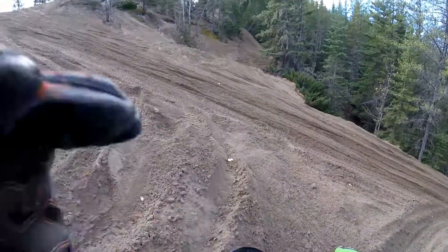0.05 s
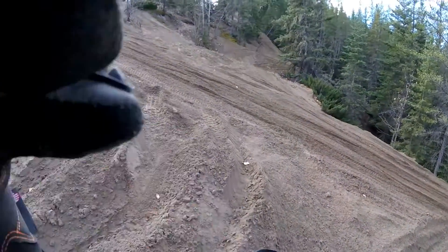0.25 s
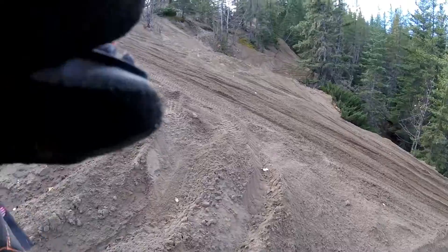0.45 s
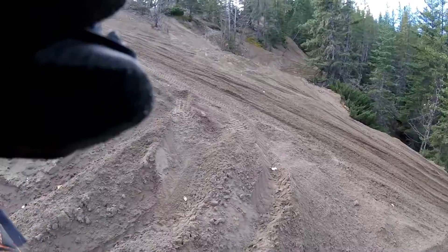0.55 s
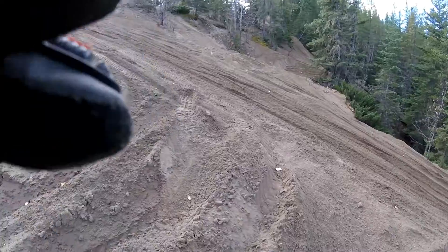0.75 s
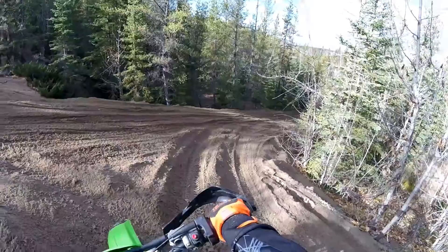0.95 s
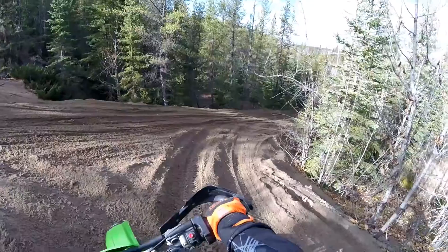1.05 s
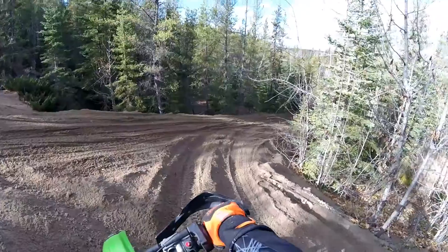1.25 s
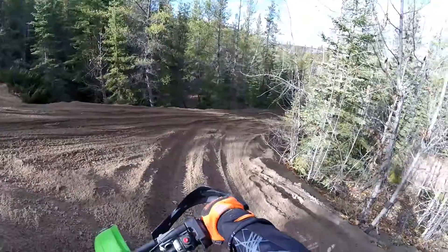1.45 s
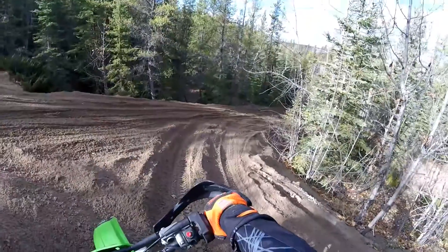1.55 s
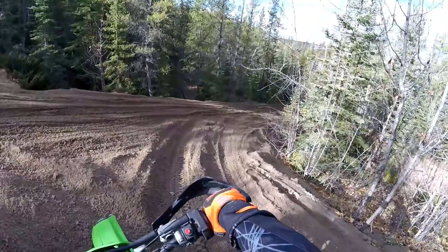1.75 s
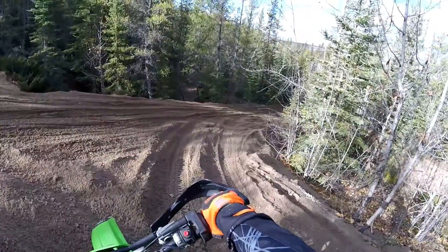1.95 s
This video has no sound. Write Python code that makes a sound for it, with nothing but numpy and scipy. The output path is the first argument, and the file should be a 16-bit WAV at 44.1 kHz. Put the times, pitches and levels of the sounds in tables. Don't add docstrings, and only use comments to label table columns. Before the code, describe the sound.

Gloved hand bumping and rubbing a camera housing, brief dropout, then a sputtering two-stroke dirt bike in wind

```python
import sys
import numpy as np
from scipy import signal
from scipy.fft import rfft, irfft, next_fast_len
from scipy.io import wavfile
from scipy.ndimage import uniform_filter1d, map_coordinates

SR = 44100
rng = np.random.default_rng(int(sys.argv[2]) if len(sys.argv) > 2 else 0)


def unload_audio(sound):
    columns = np.transpose(np.atleast_2d(sound))
    steps = np.round(np.clip(columns, -1, 1) * 32767)
    wavfile.write(sys.argv[1], SR, steps.astype(np.int16))


def voltage_ratio(level):
    return 10 ** (np.asarray(level, float) / 20)


N = 90405
CUT_S, BACK_S = 1.2172, 1.262

# time in seconds, hiss in dB, pressure in dB.
GLOVE_LEVELS = [(0, -54.5, -47), (.24, -52, -53), (.28, -51, -32), (.4, -57, -46), (.5, -55, -44),
                (.56, -60, -30), (.585, -64.5, -60), (.65, -61, -35), (.7, -61, -31.5), (.76, -57, -53),
                (.85, -60, -41.5), (.94, -59.5, -32.5), (.99, -65.5, -38.5), (1.05, -61.5, -43),
                (1.15, -67, -43.5), (1.165, -65, -66), (1.2, -76.5, -42)]
# frequency in Hz, level in dB per Hz.
RUB_COLOUR = [(120, -8.5), (200, -7.5), (400, -13), (750, -19.5), (1450, -21), (2700, -28.5), (8000, -34),
              (15500, -50.5)]
# frequency in Hz, width in Hz, lift in dB.
HOUSING_RINGS = [(3300, 170, -8), (4840, 110, -10), (6640, 480, 6.5)]
# frequency in Hz, level in dB per Hz.
PRESS_COLOUR = [(12, 2), (25, 1.5), (80, -18.5), (150, -25.5), (400, -37), (800, -79)]
# start in seconds, length in seconds, level in dB.
FABRIC_STROKES = [
    (0.273, .047, -68),
    (0.484, 0.023, -63),
    (0.539, 0.04, -60.5),
    (0.72, 0.063, -62),
    (.905, 0.03, -70),
]
# frequency in Hz, level in dB per Hz.
FABRIC_COLOUR = [(500, 6), (1500, 0), (2800, 4), (3800, -3), (5000, 8), (6500, 1), (7600, -7), (15500, -31)]
# start in seconds, length in seconds, level in dB.
THUMB_SLIDES = [
    (.276, 0.052, -61.5),
    (.671, 0.006, -53.5),
]
# frequency in Hz, level in dB per Hz.
PORT_COLOUR = [(1500, -18.5), (4500, 1.5), (5500, -13.5), (6500, 4), (7500, -8.5), (15500, -38)]
# start in seconds, peak in dB, length in seconds, brightness in dB.
FINGER_TAPS = [(0.121, -42.5, 0.015, -13.5), (0.2442, -26.5, 0.0088, -8), (0.2484, -38, 0.0094, -10),
               (0.273, -33, 0.0096, -14), (.3135, -41, 0.006, -3.5), (.2675, -23.5, 0.0097, -3),
               (0.2784, -35.5, 0.013, -6), (0.322, -29.5, 0.0093, -11), (.413, -37.5, 0.0028, -2.5),
               (0.433, -39, 0.0038, -3), (.4375, -29, 0.0057, -7.5), (0.514, -40.5, 0.0043, -3.5),
               (0.545, -43, 0.0053, -5), (.665, -36, 0.0052, -3.5), (0.6674, -30.5, 0.0075, -1.5),
               (0.674, -36.5, 0.0094, -7.5), (1.898, -54, 0.0095, -14), (2.017, -49, 0.0044, -19)]
# frequency in Hz, width in Hz, level in dB.
SHELL_LOW = [(274, 129, 7.5), (736, 220, 1.5), (1106, 194, 2.5)]
# frequency in Hz, width in Hz, level in dB.
SHELL_HIGH = [(1960, 1210, 1), (3370, 1500, -6.5), (6460, 245, -4.5)]
# start in seconds, peak in dB, frequency
# in Hz, 60 dB fade in seconds.
PUSHES_IN = [(.2465, -10, 150, 0.019), (.271, -34, 53, .08), (.284, -20.5, 35, .1), (.403, -27, 96, 0.039),
             (.4405, -25.5, 167, 0.037), (.466, -25, 70, 0.13), (.545, -38.5, 312, 0.038),
             (.563, -44.5, 390, 0.024), (.538, -22, 44, 0.034), (.612, -26, 9.8, 0.18),
             (.670, -20, 155, 0.024), (.755, -31.5, 21.7, 0.52), (1.772, -29, 106, 0.13),
             (1.895, -29.5, 99, 0.095), (1.297, -28, 32, 0.072), (.3255, -28.5, 162, 0.0355),
             (.4405, -24.5, 304, 0.044), (.447, -24.5, 78, 0.082), (1.897, -34.5, 316, 0.04),
             (2.013, -37.5, 290, 0.023), (1.705, -52, 300, 0.038),
             (.5475, -10, 36, .05),
]
# start in seconds, peak in dB, frequency in Hz, 60 dB fade in seconds.
PANEL_RINGS = [(.1215, -44, 1006, 0.027), (.2455, -31, 1224, 0.011), (.268, -21.5, 727, 0.014),
               (.3235, -35, 1110, 0.019), (.3235, -37.5, 400, 0.033), (.4375, -32.5, 1285, 0.02),
               (.438, -34.5, 1810, 0.013), (.667, -27.5, 764, 0.015), (.668, -33.5, 3300, 0.0079),
               (.668, -32, 1120, .02), (.668, -40, 4100, .008), (1.897, -40, 600, 0.022)]
# start in seconds, peak in dB, frequency
# in Hz, 60 dB fade in seconds.
PULLS_OUT = [(.2545, -16, 82, 0.037), (.268, -11.5, 180, 0.03), (.279, -18, 99, 0.036),
             (.294, -21.5, 67.3, 0.14), (.667, -21.5, 150, 0.012), (.5445, -29, 160, 0.014),
             (0.26, -25, 220, 0.014),
             (.572, -21, 13, .2),
]
FINAL_BLOW = 1.2079, -8.3, .00011, .0038, .4
# time in seconds, turns a second.
CRANK_SPEED = [(1.3, 88), (1.41, 96), (1.52, 95.5), (1.6, 102), (1.66, 107.5), (1.69, 107), (1.82, 99),
               (1.96, 91), (2.05, 98)]
# first pulse in seconds, length in seconds, level in dB, growth in dB a second.
FIRING_FITS = [(1.3255, .025, -65, 380), (1.386, .005, -63, 0), (1.4045, .015, -65, 850),
               (1.4365, .005, -67, 0), (1.457, .026, -64, 400), (1.49, .025, -66, 0),
               (1.5195, .168, -54, -24), (1.7215, .025, -63, 250), (1.764, .015, -66, 0),
               (1.8125, .014, -60, 450), (1.848, .04, -67, 0), (1.906, .005, -59, 0),
               (1.9595, .025, -59, 0), (1.9915, .005, -62, 0), (2.0015, .06, -54.5, 30)]
# frequency in Hz, width in Hz, level in dB.
PIPE_CLOSED = [(590, 95, 1.5), (850, 140, -11), (1300, 160, -13), (1550, 250, -14), (1950, 100, -17)]
# frequency in Hz, width in Hz, level in dB.
PIPE_OPENED = [(655, 105, 1.5), (850, 130, -7), (1500, 300, -22), (2010, 140, -17)]
# frequency in Hz, level in dB per Hz.
RASP_COLOUR = [(300, -15), (700, -13.5), (1050, -10.5), (1500, -10), (2700, -17.5), (4600, -19),
               (6600, -20.5), (11000, -38)]
# frequency in Hz, width in Hz, lift in dB.
FIN_RINGS = [(1950, 45, 8), (2300, 60, 4), (2770, 60, 10), (3310, 70, 6), (3890, 35, 10), (4430, 45, 14),
             (4700, 120, 4), (5000, 50, 8), (5730, 45, 10), (6480, 50, 14)]
# frequency in Hz, level in dB per Hz.
INTAKE_COLOUR = [(3400, -19), (4400, -1.5), (4700, 2), (5100, -1.5), (5700, -6.5), (6600, -11), (8000, -33)]
# time in seconds, level in dB.
WIND_LEVELS = [(1.265, -67), (1.3, -38.5), (1.344, -42), (1.37, -37), (1.4, -39), (1.5, -33),
               (1.536, -40.5), (1.6, -33.5), (1.656, -44.5), (1.716, -40.5), (1.74, -38.5), (1.8, -37.5),
               (1.84, -40.5), (1.88, -35.5), (1.938, -40), (1.966, -34), (2.0, -44.5), (2.05, -37)]
# frequency in Hz, level in dB per Hz.
BUFFET_COLOUR = [(12, -11), (20, 2), (60, 1), (130, -11.5), (230, -20.5), (400, -32.5), (700, -37),
                 (1500, -64.5)]
# time in seconds, treble edge in Hz.
TREBLE_EDGE = [(1.262, 1480), (1.34, 2680), (1.5, 3700), (1.62, 5660), (2.05, 8100)]
# time in seconds, size in dB.
SWITCH_UP = [
    (.612, -44),
    (1.1572, -33.5),
]
# time in seconds, size in dB.
SWITCH_DOWN = [
    (0.5174, -33.5),
]
# time in seconds, size in dB.
SWITCH_LATE = [
    (1.2625, -39.5),
    (1.2948, -34),
]
# frequency in Hz, width in Hz, level in dB.
WHIRR_BANDS = [(3400, 200, 0), (4550, 320, -2)]


def unit(x):
    return x / np.sqrt(np.mean(x ** 2) + 1e-20)


def clock():
    return np.arange(N) / SR


def since(s):
    return np.maximum(clock() - s, 0)


def curves(rows):
    s, *cols = np.transpose(rows)
    return [np.interp(clock(), s, c) for c in cols]


def wobble(rate):
    knots = rng.standard_normal(int(N * rate / SR) + 4)
    return map_coordinates(knots, [np.arange(N) * rate / SR])


def filtered(x, response):
    m = next_fast_len(N + SR // 2)
    return irfft(rfft(x, m) * response(np.fft.rfftfreq(m, 1 / SR)), m)[:N]


def rings(peaks):
    def response(f):
        total = 0
        for k, (c, w, db) in enumerate(peaks):
            total = total + (-1) ** k * voltage_ratio(db) * 1j * f * w / (c * c - f * f + 1j * f * w)
        return total
    return response


def soft(edge_hz):
    return lambda f: 1 / (1 + 1j * f / edge_hz) ** 2


def noise(spectrum, lifts=()):
    hz, db = np.transpose(spectrum)

    def response(f):
        colour = voltage_ratio(np.interp(np.log(f + 1), np.log(hz + 1), db))
        return colour * (1 + sum(voltage_ratio(g) / (1 + (2 * (f - c) / w) ** 2) for c, w, g in lifts))
    return unit(filtered(rng.standard_normal(N), response))


def swell(rows):
    level = np.zeros(N)
    for s, length, db in rows:
        level += voltage_ratio(db) * np.abs(np.sin(np.pi * np.minimum(since(s) / length, 1))) ** 0.48
    return level


def taps():
    dull, sharp = np.zeros(N), np.zeros(N)
    for s, db, length, bright_db in FINGER_TAPS:
        t = since(s)
        burst = (t > 0) * voltage_ratio(db - 25 * t / length) * rng.standard_normal(N)
        dull += burst
        sharp += voltage_ratio(bright_db - 920 * t) * burst
    both = filtered(dull, rings(SHELL_LOW)) - filtered(sharp, rings(SHELL_HIGH))
    return voltage_ratio(10) * filtered(both, soft(29000))


def flexes(rows):
    total = np.zeros(N)
    for s, db, hz, t60 in rows:
        t = since(s)
        swing = 1.6 * np.sin(2 * np.pi * hz * t)
        total += voltage_ratio(db - 60 * t / t60) * swing * (1 - np.exp(-t / .0015))
    return total


def glove():
    rub_db, press_db = curves(GLOVE_LEVELS)
    rub = voltage_ratio(rub_db + 2.37 * np.tanh(wobble(39.7))) * noise(RUB_COLOUR, HOUSING_RINGS)
    press = voltage_ratio(press_db + 1.4 * wobble(11.83)) * noise(PRESS_COLOUR)
    unevenness = voltage_ratio(4.8 * wobble(150.8))
    strokes = swell(FABRIC_STROKES) * noise(FABRIC_COLOUR) + swell(THUMB_SLIDES) * noise(PORT_COLOUR)
    return rub + press + unevenness * strokes


def last_blow():
    s, db, rise, sag, under = FINAL_BLOW
    lead_s, lead_share = .001, .3
    ring_db, ring_t60 = -33, .009
    jump = 1 / (1 + np.exp(-np.clip((clock() - s) / rise, -50, 50)))
    lead = lead_share * np.exp(np.minimum(clock() - s, 0) / lead_s) * (1 - jump)
    fall = (1 + under) * np.exp(-since(s) / sag) - under
    rattle = jump * voltage_ratio(ring_db - 60 * since(s) / ring_t60) * noise(PORT_COLOUR)
    return voltage_ratio(db) * (lead + jump * fall) + rattle


def engine():
    throttle_s, intake_s, clutch_s = 1.95, 1.8, 1.8
    misfire_db, gear_teeth = -69, 20.8
    t = clock()
    turns = np.cumsum(curves(CRANK_SPEED)[0] * (1 + .003 * wobble(60))) / SR

    def pulses(s):
        first = turns[int(np.ceil(s * SR))]
        return np.diff(np.floor(turns - first), prepend=0) > 0

    fire, train = np.zeros(N), np.zeros(N)
    for s, length, db, growth in FIRING_FITS:
        lit = voltage_ratio(db + growth * since(s)) * (t >= s) * (t < s + length)
        fire += lit
        train += lit * pulses(s)
    train += voltage_ratio(misfire_db) * (fire == 0) * pulses(0)
    fire += voltage_ratio(misfire_db)
    train = train * voltage_ratio(1.2 * wobble(100)) * 21

    exhaust = filtered(train * (t < throttle_s), rings(PIPE_CLOSED))
    exhaust += filtered(train * (t >= throttle_s), rings(PIPE_OPENED))
    exhaust = voltage_ratio(22.5) * filtered(exhaust, soft(1600))

    gate = np.convolve(train, voltage_ratio(-60 * t[t < .05] / .05))[:N] / 20
    gate = gate + .5 * uniform_filter1d(fire, size=900)
    coast = voltage_ratio(-66.5 + 3.0 * wobble(25.04)) * noise(RASP_COLOUR, FIN_RINGS[:5])
    suction = voltage_ratio(-10) * (t > intake_s) * gate * noise(INTAKE_COLOUR)
    whine = voltage_ratio(-73 + 3 * wobble(30.1)) * (t > clutch_s) * np.sin(2 * np.pi * gear_teeth * turns)
    rasp = voltage_ratio(-8.5) * gate * noise(RASP_COLOUR, FIN_RINGS)
    return -exhaust + rasp + coast + suction + whine


def wind():
    return voltage_ratio(curves(WIND_LEVELS)[0]) * unit(voltage_ratio(2.4 * wobble(35.03)) * noise(BUFFET_COLOUR))


def opening(x):
    hz, t, z = signal.stft(x, SR, nperseg=512)
    edge = np.interp(t, *np.transpose(TREBLE_EDGE))
    loss_db = 4 * np.maximum(hz[:, None] - edge, 0) / 1000
    return signal.istft(z * voltage_ratio(-loss_db), SR, nperseg=512)[1][:N]


def steps(rows):
    return sum(voltage_ratio(db) * (clock() > s) * np.exp(-since(s) / .012) for s, db in rows)


def whirr():
    level = voltage_ratio(-65 + 1.8 * wobble(65)) * (clock() < .245)
    bands = filtered(rng.standard_normal(N), lambda f: rings(WHIRR_BANDS)(f) ** 2)
    return level * unit(bands)


def gap():
    return voltage_ratio(-72 - 1000 * since(CUT_S)) * noise([(100, 4), (700, -4), (1500, -57), (4000, -90)])


def scene():
    t = clock()
    knocks = taps() + flexes(PUSHES_IN + PANEL_RINGS) - flexes(PULLS_OUT)
    before = glove() + whirr() + knocks + last_blow() + steps(SWITCH_UP) - steps(SWITCH_DOWN)
    ride = np.minimum(since(BACK_S) / 0.0073, 1) * opening(engine() + wind())
    late_knocks = opening(knocks * (t > BACK_S))
    late_steps = filtered(steps(SWITCH_LATE), soft(1600))
    after = ride + late_knocks - late_steps + gap()
    return np.where(t < CUT_S, before, after)[None]


def roll_off(x):
    return signal.sosfilt(signal.butter(12, 16520, fs=SR, output="sos"), x)


def record(dry):
    shelf = lambda f: voltage_ratio(-12 * (1 + np.tanh((f - 15500) / 60)) / 2)
    mix = filtered(dry[0], shelf)[None]
    return roll_off(mix)


dry = scene()
out = record(dry)
unload_audio(out)
```